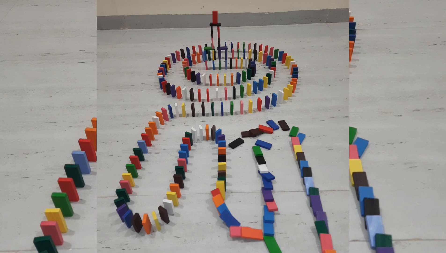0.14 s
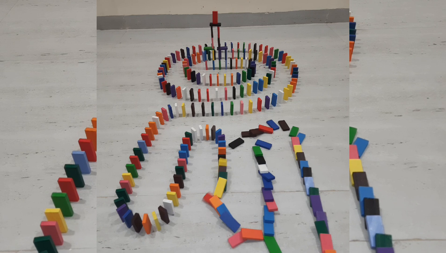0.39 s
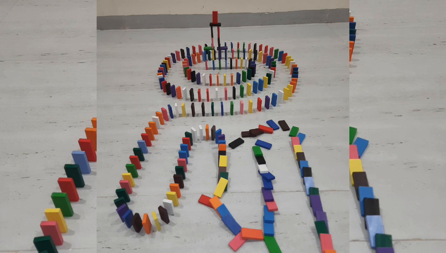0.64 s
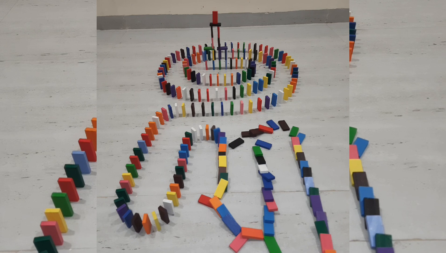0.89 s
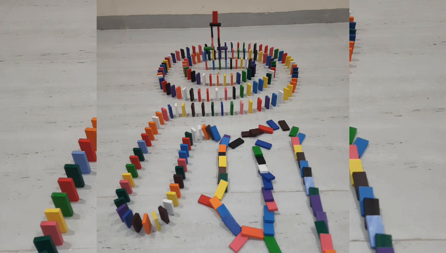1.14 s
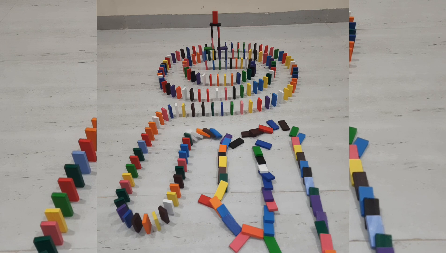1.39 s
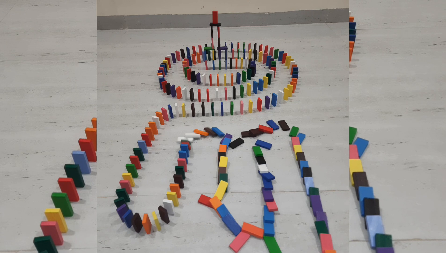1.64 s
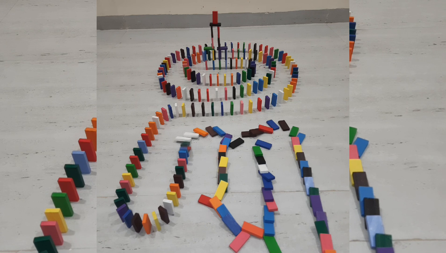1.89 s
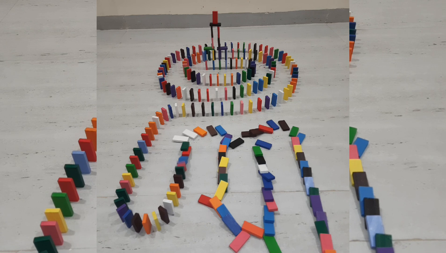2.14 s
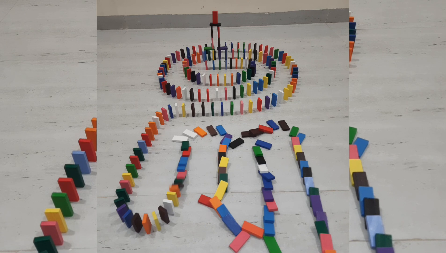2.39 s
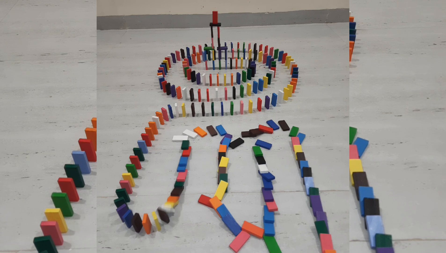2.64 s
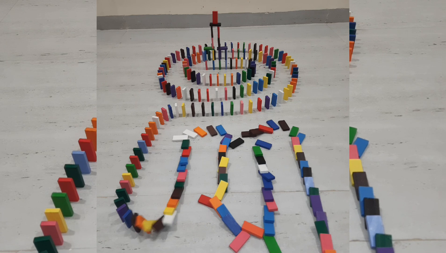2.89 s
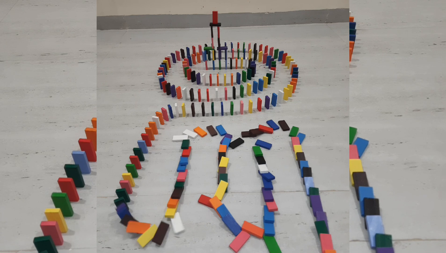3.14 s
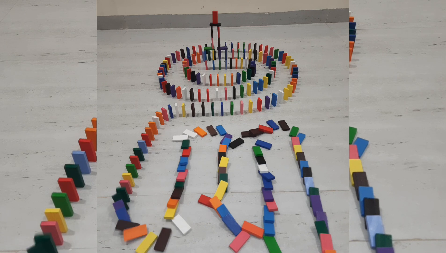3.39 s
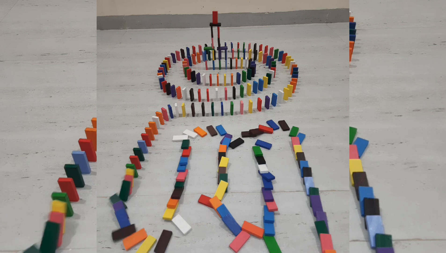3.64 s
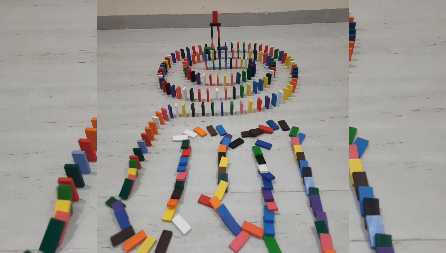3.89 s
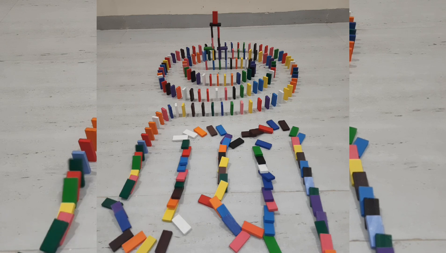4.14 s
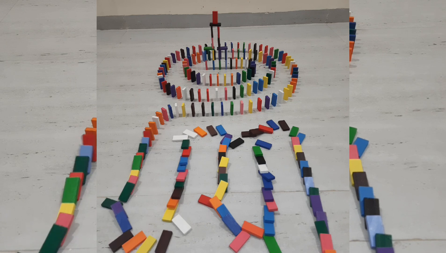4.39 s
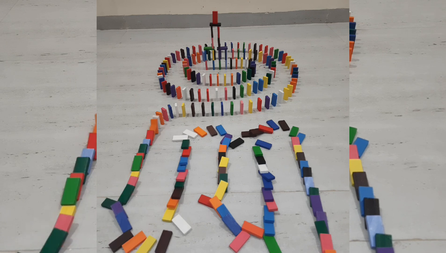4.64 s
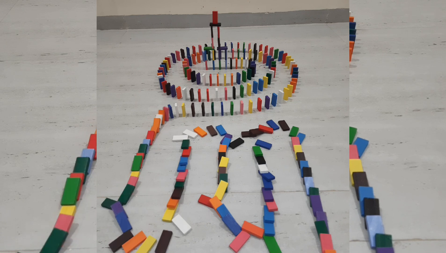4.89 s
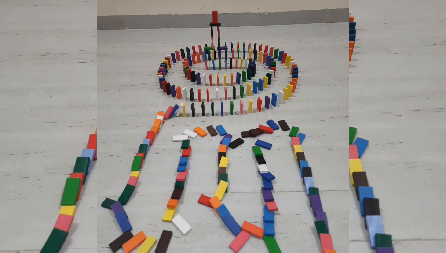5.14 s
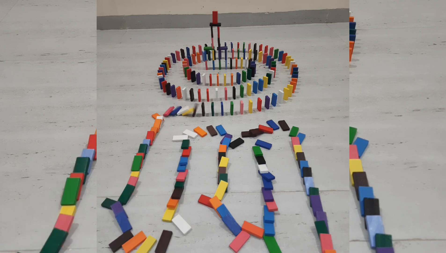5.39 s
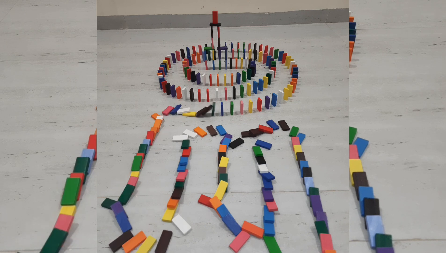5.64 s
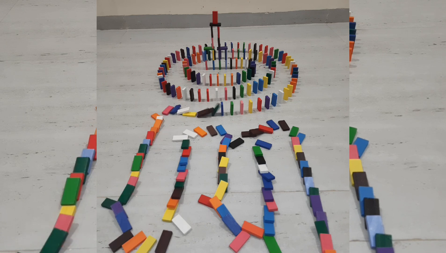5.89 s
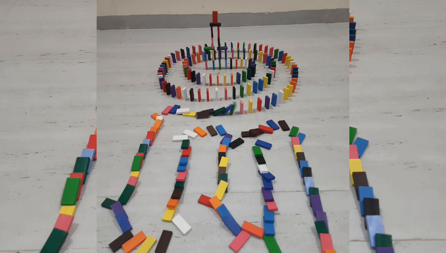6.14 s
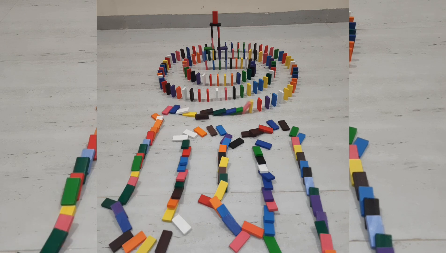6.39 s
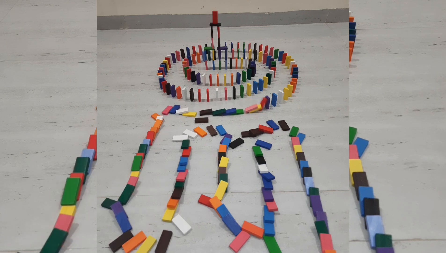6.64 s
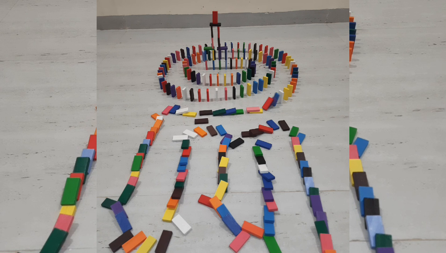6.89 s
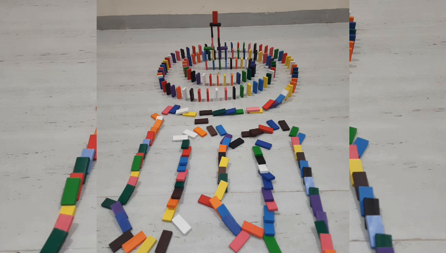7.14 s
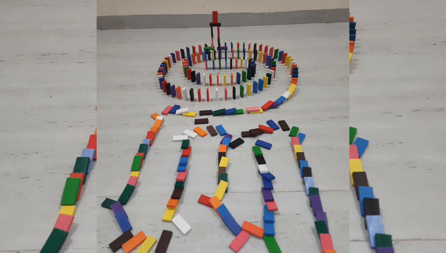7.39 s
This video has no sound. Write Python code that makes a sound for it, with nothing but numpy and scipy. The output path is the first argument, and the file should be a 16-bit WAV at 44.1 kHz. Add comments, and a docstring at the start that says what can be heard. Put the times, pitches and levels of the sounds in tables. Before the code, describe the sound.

Small hollow plastic dominoes knock into each other and slap onto stone, making a dense rattle of clicks from start to finish. Brighter, louder hits poke out irregularly and peak just past halfway, with a soft rumble as the stereo microphones shake. The toppling then eases a little but keeps running. Hard walls give each clack a short ringing tail, and the sound shifts gently as the line winds along.

```python
"""A line of plastic dominoes topples across a stone floor in a bare room, winding towards a stereo pair of
microphones and away. Each contact is a dull knock, a hollow clack, a bright crack and one tile's ring.
Loud falls stand out of a dense clatter; the harder the tiles hit, the brighter they sound.
Far off the room takes over; close up the falls shake the microphone stand.
The recorder samples slowly, so the treble mirrors the band below."""
import sys
import numpy as np
from scipy import signal
from scipy.fft import rfft, irfft, next_fast_len
from scipy.io import wavfile

SR = 44100
rng = np.random.default_rng(int(sys.argv[2]) if len(sys.argv) > 2 else 0)


def persist_wave(psi):
    """Save psi, clipped to +-1, as 16-bit WAV."""
    counts = np.round(np.clip(psi, -1, 1) * 32767).astype(np.int16)
    wavfile.write(sys.argv[1], SR, np.atleast_2d(counts).T)


N = 329868
RECORDER_HZ = 12000
LEFT_DB = 1.5  # the clatter and what lingers sit left of centre

# loud single falls: t/s, level/dB, weights of clack/dB, ring/dB and crack/dB, ring f/Hz,
# left over right/dB, bounces re first blow/dB
LOUD_FALLS = [(0.349, -35, -14, -17, -35, 3050, 5.5, 12), (0.5925, -29.5, -9.5, -16.5, -27, 3010, -3, 1.5),
              (0.676, -31, -20, -18, -37, 2940, 0, 0), (0.756, -35, -21, -22, -26, 2870, -6, 1.5),
              (0.819, -31, -24, -12.5, -24, 2950, -6, 2), (0.89, -33, -17, -21, -31, 2890, -7, -4),
              (0.898, -26, -19.5, -20.5, -33.5, 2870, -7.5, -7), (1.03, -29, -20, -24, -35, 3310, -3, -5),
              (1.044, -25, -30, -21, -32, 3310, -1.5, 9.5),
              (1.136, -23, -37, -15.5, -35.5, 3060, 2.5, -4.5), (1.151, -25, -9, -27, -36.5, 3140, 0.5, -5),
              (1.163, -30.5, -29, -31, -31, 3000, -6, -12), (1.533, -25, -7, -23.5, -26.5, 3690, 2.5, 1),
              (1.556, -32.5, -33, -17, -29, 2620, 3, -10), (1.611, -22.5, -4.5, -18, -18, 3160, 3.5, -7),
              (2.055, -33.5, -26, -14, -29, 2760, 2.5, 3.5), (2.135, -34.5, -31, -16.5, -35, 2900, 3, -8),
              (2.165, -33.5, -20, -37, -46, 2850, 1, -13), (2.218, -25.5, -12.5, -25, -26, 2950, 0, -13.5),
              (2.26, -31.5, -22.5, -21, -20, 3050, 3.5, -14.5), (2.344, -33, 0, -11.5, -23, 3740, 9, -13),
              (2.388, -28, -11, -12.5, -27, 3240, -2, -10), (2.413, -22, -7.5, -18, -7.5, 3450, 7, -10),
              (2.42, -26.5, -14, -4.5, -1.5, 2710, 9.5, 3), (2.487, -28.5, -10.5, -13, -4, 2990, 4, -2),
              (2.527, -27, -21.5, -12.5, -26, 3240, 1, 0.5), (2.662, -26, -4, -8, -8.5, 2780, 7, -12),
              (2.685, -31, -11, -14.5, -4, 2660, 1.5, -4.5), (2.757, -32, -23.5, -20.5, -21.5, 2730, 3, -2),
              (2.849, -28, -35, -28, -24, 2920, 0, -3), (2.873, -32, -10, -13, -16, 2630, 6, -2.5),
              (3.14, -32.5, -8.5, -10, -17.5, 3210, -1.5, -10.5),
              (3.2, -32.5, -13.5, -13, -32, 3233, -0.5, 0.5),
              (3.256, -36.5, -22.5, -17, -21.5, 2600, -4, 12), (3.561, -33, -28, -23, -45, 2730, -4, -5),
              (3.586, -35, -22, 3, -31, 2660, 0, 4), (3.6205, -33, -13, -36, -36, 3000, 2.5, -20.5),
              (3.67, -22, 5.5, -4, -20, 3170, 2, 4.5), (3.684, -19.5, -13.5, -10, -27, 2750, 2, -2),
              (3.9, -35, -16, -34.5, -50, 2700, -4.5, -23), (3.935, -14, 5.5, -11.5, -5, 3230, -2, -4.5),
              (3.98, -31.5, -16, -17.5, -25, 2960, 7, -13.5),
              (4.193, -28.5, -7.5, -31, -11, 2900, -6, -24.5), (4.208, -32, -5.5, -25, -35, 2700, 3, -22),
              (4.253, -29.5, -17, -18.5, -21, 3020, -2.5, -7),
              (4.298, -24.5, 4.5, -20, -3.5, 3390, -3.5, -19),
              (4.311, -33, -4.5, -23, -28.5, 2600, 11.5, -14), (4.3286, -19, 6, -6.5, -7, 3835, 4.5, 0.5),
              (4.445, -22.5, -2.5, -24, -11, 3000, 2, -16), (4.522, -20, -11.5, -16, -24, 3060, 0, -1.5),
              (4.656, -25.5, -17.5, -23, -27, 3460, 2, -5), (4.805, -24, -2, -16, -19, 2910, 3, -10),
              (5.044, -24.5, -9.5, -36, -28, 3650, -0.5, -14), (5.509, -35, -7, -43, -25, 3030, 5.5, 2),
              (5.692, -38, -2.5, -9, -11.5, 3110, 7, -1.5), (5.821, -32.5, -3.5, -8, -19.5, 3070, 7, -8),
              (5.866, -33, -8, -16, -19, 3596, 2.5, -4), (5.971, -35, -9, -3, -10, 3530, 10.5, -0.5),
              (6.002, -29, -9, -12, -12.5, 3690, 3.5, 1.5), (6.142, -36, -29, -6.5, -20.5, 3730, 2, -8),
              (6.159, -25, 0, 0.5, -14, 3580, 3, -17), (6.373, -29, -7, -8.5, -18.5, 3600, 9.5, -1.5),
              (6.534, -31.5, -19, -16, -16, 3050, 4.5, -1),
              (6.677, -26.5, -6.5, -15.5, -17, 2906, 9.5, -9.5),
              (6.986, -30.5, -17, -10.5, -13.5, 3200, 3, 2.5),
              (7.026, -33.5, -12.5, -15, -17, 3220, 6, -4.5), (7.077, -33.5, -13, -5, -2.5, 3240, 8, -6.5),
              (7.13, -27.5, -17, -17.5, -16, 3260, 2, 5.5)]
# bearing and distance of the toppling front: t/s, lag at the left microphone/ms, room lift/dB
FRONT_PATH = [(0, 0.538, -2), (1.2, 0.14, 0.5), (1.7, -0.059, 1), (2.7, -0.045, 3.5), (3.2, 0.326, 1),
              (3.9, 0.572, -5), (4.3, 0.547, -1.5), (4.7, -0.084, 5), (5.3, -0.22, -0.5),
              (7.48, -0.25, 3.5)]


def falls():
    """Single tiles slap the stone or hit a neighbour hard, then bounce, sharing out the blow's energy."""
    # a corner touches, the tile slaps down and bounces twice: delay t/s, level/dB, 1 for a bounce
    touches = [(-.004, -17, 0), (0, 0, 0), (.0035, -1.5, 1), (.008, -8, 1)]
    # spectrum of a hard slap: f/Hz, level/dB
    slap = [(50, -40), (140, -23), (300, -16.5), (550, -7), (900, -2), (1300, 3.5), (1700, -4), (2400, -6),
            (4000, -35.5)]
    rows = np.repeat(LOUD_FALLS, len(touches), axis=0)
    times, level_db, clack_db, ring_db, crack_db, ring_hz, pan_db, bounce_db = rows.T
    delay, touch_db, is_bounce = np.tile(touches, (len(LOUD_FALLS), 1)).T
    slowness = np.repeat(rng.lognormal(0, .1, len(LOUD_FALLS)), len(touches))
    knock_db, lift_db = np.full(len(times), -12.5), 3.5
    parts_db = np.array([knock_db, clack_db, crack_db + lift_db, ring_db + lift_db])
    shares_db = parts_db - 10 * np.log10(np.sum(amp(parts_db) ** 2, axis=0))
    touch_db = touch_db + is_bounce * bounce_db - 10 * np.log10(1 + amp(bounce_db) ** 2)
    return contacts(times + delay * slowness, level_db + shares_db + touch_db, pan_db, ring_hz, slap,
                    span=.009, chatter_db=(-3, -3, -5, -8), chatter_t60=.017, ring_width_hz=74)


def clatter(count=900, tiles=110):
    """Many light contacts as the leaning tiles tap, slide and settle."""
    # the running wave of tiles: t/s, knock level/dB, treble level/dB
    wave = [(0.0, -42.5, -36), (0.55, -50.5, -53.5), (0.8, -42.5, -50), (0.93, -37.5, -39.5),
            (1.16, -45, -46), (1.33, -41.5, -46), (1.5, -55.5, -62), (1.6, -46, -52), (1.65, -41.5, -41.5),
            (1.8, -47, -48), (2.0, -47.5, -50.5), (2.2, -46.5, -46.5), (2.39, -43.5, -46),
            (2.47, -41.5, -38), (2.65, -40, -40), (2.9, -41, -43.5), (3.25, -47, -47.5),
            (3.52, -47.5, -57.5), (3.68, -38.5, -40), (3.87, -44, -46.5), (4.05, -40.5, -40),
            (4.27, -39.5, -41), (4.37, -36.5, -34.5), (4.55, -42.5, -39.5), (4.8, -44, -48.5),
            (5.13, -44, -52), (5.45, -46.5, -55.5), (5.79, -50.5, -50.5), (5.88, -40.5, -44),
            (6.05, -45, -43), (6.3, -41.5, -42.5), (6.64, -43, -42.5), (6.7, -41.5, -38.5),
            (6.85, -43.5, -45.5), (7.1, -43.5, -39), (7.48, -47, -48)]
    # spectrum of a light knock: f/Hz, level/dB
    light_knock = [(50, -36), (120, -25.5), (250, -14.5), (500, -7), (800, -4), (1250, -2.5), (1600, -8),
                   (2300, -10), (4000, -29)]
    jitter, force, edge, flat, side, behind = rng.standard_normal((count, 6)).T
    span = N / SR / count
    times = np.abs(np.arange(count) + .9 * jitter) * span
    # a few neighbouring tiles move at once, each with a pitch and a speed of its own
    tile = np.clip(times * SR / N * tiles + behind / 2, 0, tiles - 1).astype(int)
    tuning, speed = rng.standard_normal((tiles, 2))[tile].T
    pick, chance = rng.random((tiles, 2))[tile].T
    ring_hz = tile_pitch(times, pick, chance) * (1 + .02 * tuning)
    knock_db, treble_db = at(wave, times)
    hardness_db = treble_db - knock_db
    force_db = 4 * np.clip(force, -2, 1.4) + 2 * speed
    # an edge strikes brighter, a flat side knocks more
    levels_db = [knock_db - .5 + 2 * flat,
                 treble_db - 3.5 + .25 * hardness_db,  # clack
                 treble_db - 8 + .36 * hardness_db + 2 * edge,  # crack
                 treble_db - 6 + 3 * edge]  # ring
    return contacts(times, levels_db + force_db, LEFT_DB + 2 * side, ring_hz, light_knock,
                    span, chatter_db=(3.5, 1, 0, -3), chatter_t60=.062, ring_width_hz=88)


def contacts(times, levels_db, pan_db, ring_hz, knock_spectrum,
             span, chatter_db, chatter_t60, ring_width_hz, size=1024):
    """Each blow excites knock, clack, crack and ring, in that order; levels are means over span seconds."""
    # modes of the hollow tiles: f/Hz, width/Hz, level/dB
    clack_modes = [(1890, 1540, -8), (2093, 369, 13.5), (2241, 222, 11)]
    # pitch of the clack along the line: t/s, ratio to the usual pitch
    clack_pitch = [(0.6, 0.926), (0.676, 0.36), (0.898, 0.32), (1.136, 0.666), (1.611, 1), (2.217, 0.98),
                   (3.935, 1), (4.3, 0.91), (4.52, 1), (4.805, 0.704), (5.044, 0.53), (5.5, 0.97)]
    # spectrum of the crack: f/Hz, level/dB
    crack_spectrum = [(1200, -16), (2100, -53), (2500, 4), (2900, 2.5), (3400, 9), (4200, 13.5),
                      (5000, 2.5), (6000, 4)]
    # high tile modes that colour the crack: f/Hz, width/Hz, level/dB
    crack_modes = [(3560, 130, -6), (4817, 52, 17.5)]
    count, t = len(times), np.arange(size) / SR
    grid = np.fft.rfftfreq(size, 1 / SR)
    hz = grid[grid < RECORDER_HZ / 2]
    # the blow reaches the two microphones at different moments
    lag_s = at(FRONT_PATH, times)[0][:, None, None] / 1000
    blow = np.exp(-1j * np.pi * hz * (np.abs(lag_s) + lag_s * np.array([[1], [-1]])))
    # the tile chatters on, and its neighbours scatter the sound
    fade = amp(-60 * t / chatter_t60)
    chatter = rfft(rng.standard_normal((count, 2, size)) * fade / np.linalg.norm(fade))[..., :len(hz)]
    knock = minimum_phase(knock_spectrum, grid)[None, :len(hz)]
    clack_ratio = at(clack_pitch, times)[0][:, None]
    clack = struck_tiles(clack_modes, hz, count, detune=.012, spread_db=4, pitch=clack_ratio)
    overtones = struck_tiles(crack_modes, hz, count, detune=.018, spread_db=6)
    crack = minimum_phase(crack_spectrum, grid)[:len(hz)] * (1 + overtones)
    ring = resonance(hz, ring_hz[:, None], ring_width_hz)
    ring -= amp(-18.5) * resonance(hz, 1.3 * ring_hz[:, None], ring_width_hz)  # second mode
    spectra = 0
    for body, db, rough_db in zip((knock, clack, crack, ring), levels_db, chatter_db):
        part = (blow + amp(rough_db) * chatter) * body[:, None]
        power = np.sum(np.abs(part) ** 2, axis=(1, 2)) / (size * span * SR)
        spectra = spectra + part * (amp(db) / np.sqrt(power))[:, None, None]
    hits = irfft(spectra, size) * amp(np.outer(pan_db, [.5, -.5]))[..., None]
    starts = np.round(np.abs(times) * SR).astype(int)
    index = (starts[:, None] + np.arange(size)).ravel()
    return np.array([np.bincount(index, hits[:, side].ravel(), N)[:N] for side in range(2)])


def struck_tiles(modes, hz, count, detune, spread_db, pitch=1):
    """One response per contact: every tile is tuned and struck a little differently."""
    draws = rng.standard_normal((count, len(modes), 2, 1))
    response = 0
    for k, (centre, width, db) in enumerate(modes):
        gain = (-1) ** k * amp(db + spread_db * draws[:, k, 0])
        mode_hz = pitch * centre * (1 + detune * draws[:, k, 1])
        response = response + gain * resonance(hz, mode_hz, width)
    return response


def tile_pitch(times, pick, chance, alike_share=.28):
    """A tile rings like the kind that made the closest loud fall, or else like any kind."""
    # kinds of tile: ring f/Hz, share of the line
    kinds = [(2700, .07), (2792, .22), (2950, .18), (3090, .17), (3230, .22), (3580, .13)]
    kinds_hz, shares = np.transpose(kinds)
    fall_times, fall_hz = np.transpose(LOUD_FALLS)[[0, 5]]
    closest_hz = fall_hz[np.abs(times[:, None] - fall_times).argmin(axis=1)]
    neighbour_hz = kinds_hz[np.abs(closest_hz[:, None] - kinds_hz).argmin(axis=1)]
    any_hz = kinds_hz[np.searchsorted(np.cumsum(shares), pick * shares.sum())]
    return np.where(chance < alike_share, neighbour_hz, any_hz)


def room(sound, build_s=.008):
    """Hard walls answer with a diffuse tail, different at each microphone."""
    # the tiles throw their treble up into the room: f/Hz, level/dB
    throw = [(300, -2.5), (1500, 1), (3000, 2.5), (4500, -1.5)]
    # the room's decay: f/Hz, t60/s
    decay = [(150, 1), (1000, 0.98), (2500, 1), (5000, 1)]
    thrown = filtered(sound, lambda hz: amp(along(throw, hz)))
    hz, t, spectra = signal.stft(rng.standard_normal((2, SR)), SR, nperseg=256)
    tail = signal.istft(spectra * amp(-60 * t / along(decay, hz)[:, None]), SR, nperseg=256)[1]
    tail *= 1 - np.exp(-np.arange(tail.shape[1]) / SR / build_s)
    return signal.fftconvolve(thrown, tail / np.linalg.norm(tail[0]), axes=1)[:, :N]


def lingering(t60=1.36):
    """Tile notes, and a bright wash of rattle after the fall at 1.6 s, fade in the room."""
    # fading bands, those at 0 s from earlier falls: t/s, f/Hz, width/Hz, level/dB
    bands = [(0, 2145, 150, -31.5), (0, 3500, 101, -33), (0, 4840, 122, -40.5), (1.611, 3980, 450, -45),
             (2.662, 2746, 40, -47), (4.33, 2001, 40, -33), (4.522, 2017, 40, -31.5),
             (6.676, 2855, 44.8, -46), (6.677, 1235, 130, -37)]
    out = np.zeros((2, N + SR))
    t, hz = np.arange(SR) / SR, np.fft.rfftfreq(SR, 1 / SR)
    fade = amp(-60 * t / t60)
    for start, centre, width, db in bands:
        band = irfft(rfft(rng.standard_normal((2, SR))) * resonance(hz, centre, width) ** 2) * fade
        band *= np.linalg.norm(fade) / np.linalg.norm(band, axis=1, keepdims=True)
        out[:, round(start * SR):][:, :SR] += band * amp(db + LEFT_DB * np.array([[.5], [-.5]]))
    return out[:, :N]


def microphone_stand(shake_t60=.85, bump_db=18, bump_s=.0011):
    """A jolt gives one low bump, then the stand shakes the two microphones against each other."""
    # jolts of the stand: t/s, level/dB
    jolts = [(-0.03, -45), (1.61, -61), (3.937, -46), (4.328, -56), (4.62, -65)]
    # spectrum of the shaking stand: f/Hz, level/dB
    rumble = [(20, -12.5), (35, 10), (55, -9), (80, -21), (150, -37), (1000, -63)]
    shake, bump = np.zeros(N), np.zeros(N)
    for start, db in jolts:
        t = np.maximum(np.arange(N) / SR - start, 0)
        shake += amp(db - 60 * t / shake_t60) * (t > 0)
        age = t / bump_s
        bump += amp(db + bump_db) * age * (2 - age) * np.exp(-age)
    together, against = noise(rumble) * [[.42], [.9]]
    return shake * np.array([together + against, together - against]) + bump


def room_tone():
    """The faint, low hush of the still room."""
    # spectrum of the still air: f/Hz, level/dB
    air = [(35, -3), (55, -9.5), (90, -22.5), (200, -18.5), (1000, -15.5), (5000, -46)]
    return amp(-67.5) * noise(air)


def amp(db):
    """Decibels to gain."""
    return 10 ** (np.asarray(db) / 20)


def along(points, hz):
    """(Hz, value) points read on a log axis."""
    freqs, values = np.transpose(points)
    return np.interp(np.log(hz + 1), np.log(freqs), values)


def at(rows, times):
    """Each column of a curve at the given times."""
    knots, *columns = np.transpose(rows)
    return [np.interp(times, knots, column) for column in columns]


def filtered(x, response):
    """x times a response of frequency."""
    size = next_fast_len(N + SR // 2)
    return irfft(rfft(x, size) * response(np.fft.rfftfreq(size, 1 / SR)), size)[..., :N]


def noise(spectrum):
    """Stereo noise of rms 1."""
    x = filtered(rng.standard_normal((2, N)), lambda hz: amp(along(spectrum, hz)))
    return x / x.std()


def minimum_phase(spectrum, hz):
    """Causal response with the given spectrum."""
    cepstrum = irfft(np.log(amp(along(spectrum, hz))))
    half = len(cepstrum) // 2
    cepstrum[1:half] *= 2
    cepstrum[half + 1:] = 0
    return np.exp(rfft(cepstrum))


def resonance(hz, centre, width):
    """Response of one damped mode."""
    return 1j * hz * width / (centre ** 2 - hz ** 2 + 1j * hz * width)


def scene():
    """Falls and clatter over room tone; the further from the microphones, the more the room takes over."""
    loud, light = falls(), clatter()
    far_db = at(FRONT_PATH, np.arange(N) / SR)[1]
    direct = loud + amp(-1.3 - far_db / 2) * light
    to_walls = amp(-7 + far_db) * loud + amp(-1.2 + far_db / 2) * light
    return direct + room(to_walls) + lingering() + microphone_stand() + room_tone()


def record(dry):
    """Slow sampling joined by straight lines mirrors the sound into the treble."""
    edge_hz, top_hz, seconds = 5040, 16200, N // SR + 1
    band = filtered(dry, lambda hz: 1 / np.sqrt(1 + (hz / edge_hz) ** 110))
    padded = np.pad(band, ((0, 0), (0, seconds * SR - N)))
    slow = signal.resample(padded, seconds * RECORDER_HZ, axis=1)
    hz = np.fft.rfftfreq(seconds * SR, 1 / SR)
    images = np.fft.fft(slow)[:, np.arange(len(hz)) % slow.shape[1]] * SR / RECORDER_HZ
    droop = np.abs(np.sinc(hz / RECORDER_HZ)) ** 1.898
    return irfft(images * droop * (hz < top_hz))[:, :N]


dry = scene()
out = record(dry)
persist_wave(out)
```